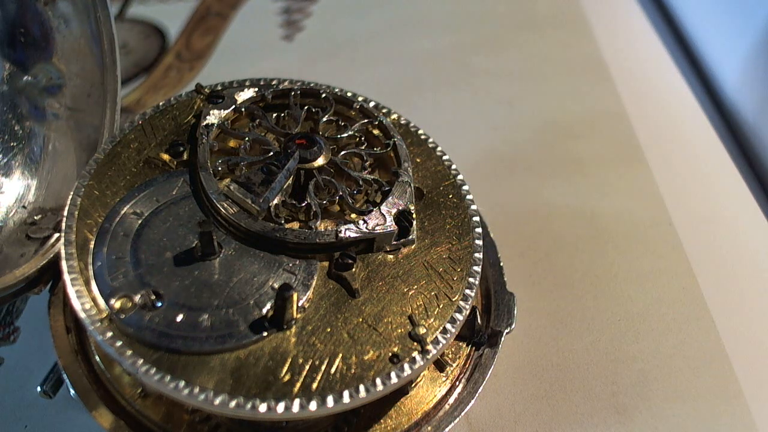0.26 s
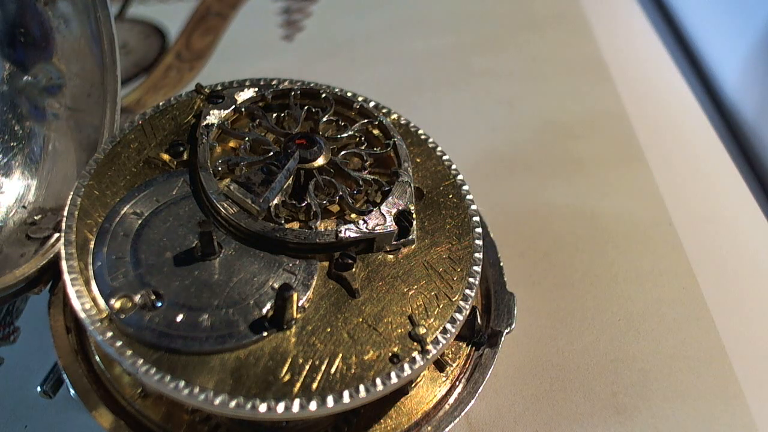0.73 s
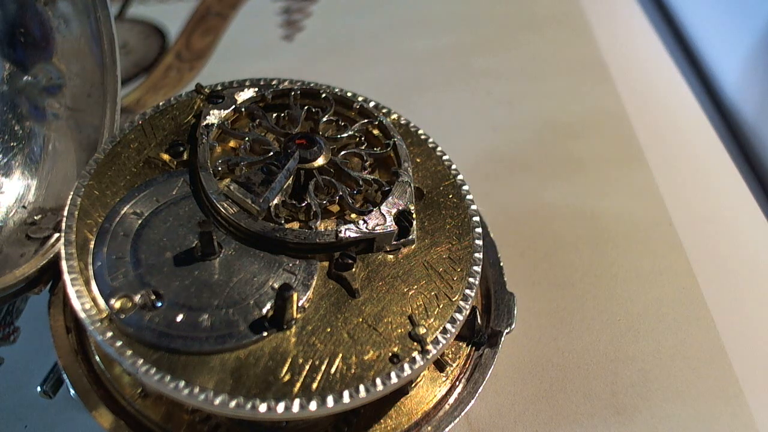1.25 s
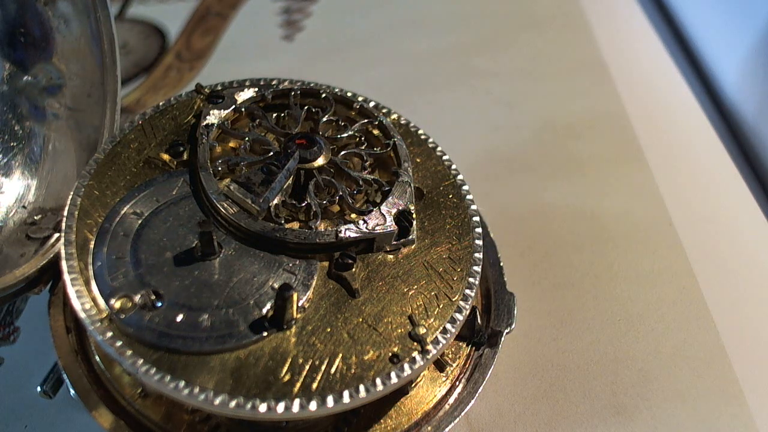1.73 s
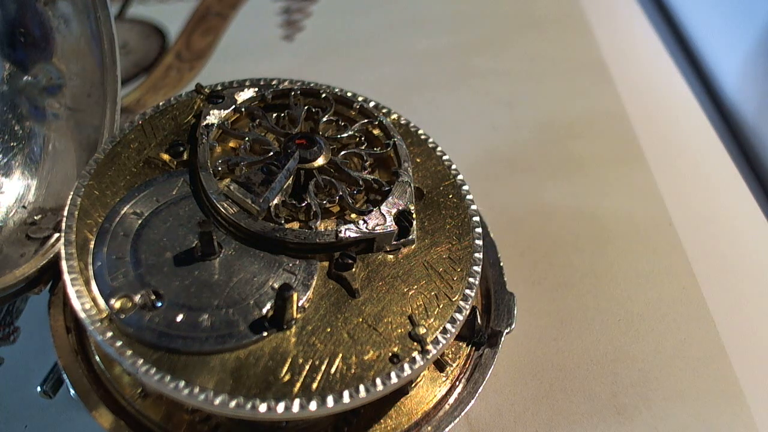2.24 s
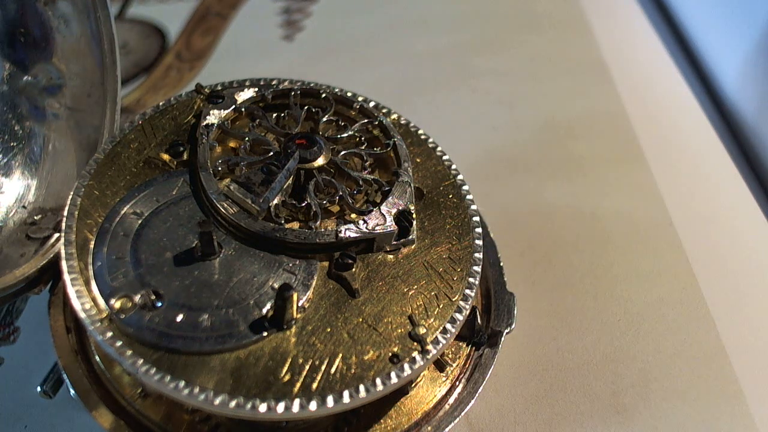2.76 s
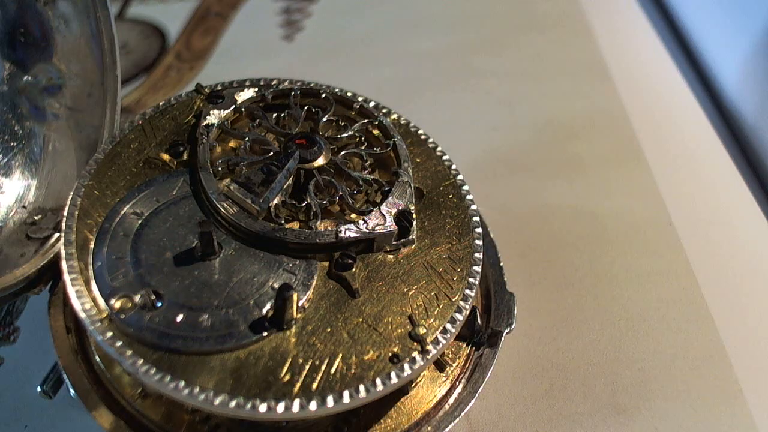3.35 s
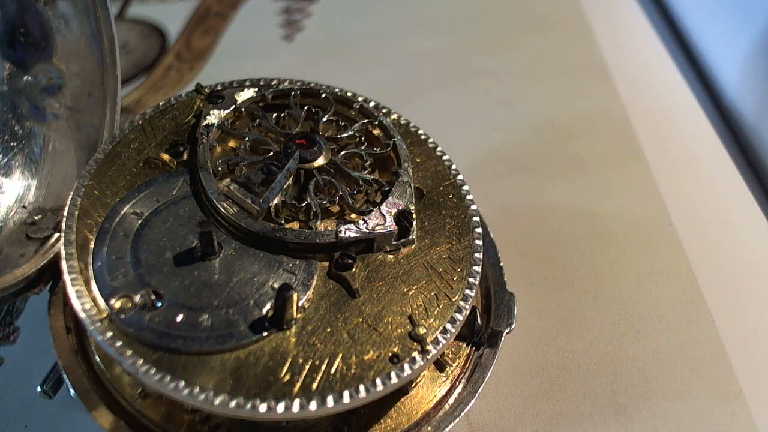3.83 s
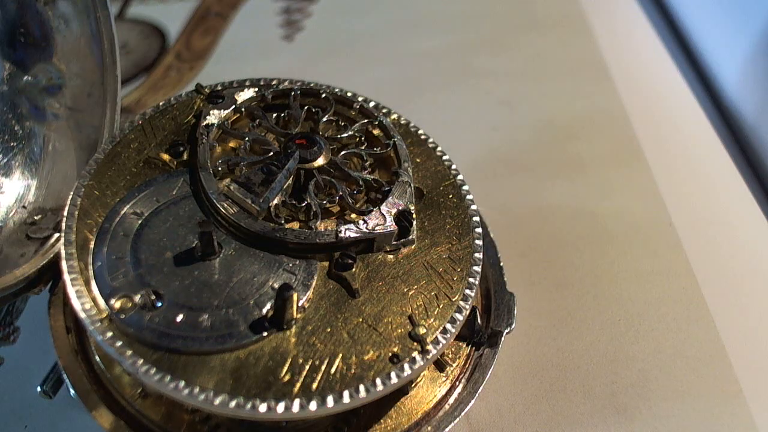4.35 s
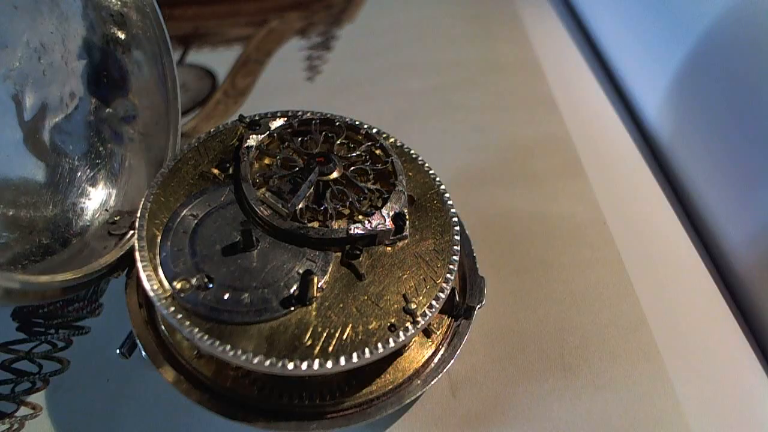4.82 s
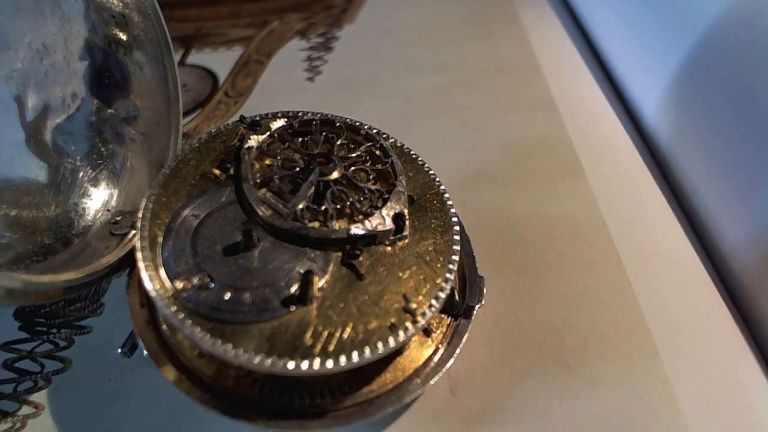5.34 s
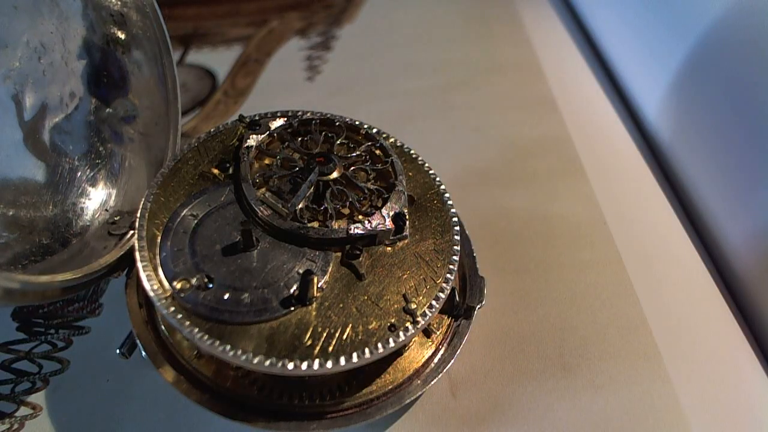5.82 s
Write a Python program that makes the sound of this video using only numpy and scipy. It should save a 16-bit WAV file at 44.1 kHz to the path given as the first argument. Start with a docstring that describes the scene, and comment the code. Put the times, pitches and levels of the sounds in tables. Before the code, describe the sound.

In a quiet room, a small microphone sits close to an open old pocket watch. At 0 seconds a low noise swell and light gritty scraping lead into a weak, rattling bump at about 0.07. A much stronger woody thump with scrape follows at 0.3, a cluster of knocks dying away by 0.5. The watch ticks throughout, from 0.14 to the end just after 6 seconds: thin, dry, bright metallic clicks about every 0.42 seconds, with much softer ticks between them, each a tiny double or triple click with a very short ring. The tick near 1.4 is duller. Faint brushing taps appear from 1.1, clearer at 2.4, 3.0, 3.5, 4.1, 4.5 and 4.9, soft and further away. Muffled low puffs come near 1.7, 3.4 to 3.6, 4.2, 4.7 and 5.0 to 5.4. Faint, mostly low, slightly wavering hiss lies underneath.

```python
"""A short swell of low noise and two scraping thumps on a bench come first, within half a second.
Close to a small camera microphone an old pocket watch lies open, beating loud and soft mostly by turns.
Soft brushing taps come from further off in the quiet room, short low swells rise over its hiss.
Watch and bench top are decaying sines; bench rattle, scrapes, brushes, swells and hiss are filtered noise."""
import sys
import numpy as np
from scipy import signal
from scipy.fft import rfft, irfft
from scipy.io import wavfile
from scipy.ndimage import uniform_filter1d

SR = 44100
rng = np.random.default_rng(int(sys.argv[2]) if len(sys.argv) > 2 else 0)


def master(y):
    """Save y as 16-bit WAV."""
    cut = np.clip(np.atleast_2d(y).T, -1, 1)
    pcm = np.round(cut * 32767)  # scale
    wavfile.write(sys.argv[1], SR, pcm.astype(np.int16))


N = 268128

# Escapement beats. Each row: blow in seconds, levels of upper ring, middle ring, lower ring and knock in dB,
# rebound against blow in dB, noise tail in dB, tilt of the tail in dB per octave.
BEATS = [(0.1404, -33.5, -54, -47.5, -58, -1.5, -58.5, 10), (0.5622, -31, -43, -45.5, -61, -6.5, -58.5, 3),
         (0.752, -62.5, -74, -52.5, -64, 0.5, -61.5, -14), (0.9838, -27, -39, -47.5, -59.5, -8, -57.5, 8),
         (1.174, -73, -72, -71, -78, -14, -66, -7), (1.3968, -70, -47, -49, -60.5, -8.5, -57, -9),
         (1.5915, -66, -67, -52.5, -61, -20, -62, -11.5), (1.8201, -25.5, -35.5, -33, -57, -21.5, -53, -2),
         (2.007, -60, -77, -55, -66, -26, -66, -3.7), (2.236, -28, -39, -34, -68, -20, -53.5, 0.1),
         (2.426, -49, -54, -44, -61, -8.5, -64, -4.1), (2.657, -28, -37, -34, -54, -4, -58.5, 9.5),
         (2.844, -59.5, -66, -56, -72, -10, -64.5, -2), (3.072, -27, -37.5, -31, -60.5, -17, -58, 3),
         (3.2617, -63, -62, -58.5, -70.5, -9, -63, -9),
         (3.4902, -25.5, -37.5, -34.5, -55.5, -20, -54.5, 5.5),
         (3.678, -61, -73.5, -66, -75.5, -21, -66.5, -4.2), (3.9063, -30, -44, -38, -67.5, -16, -62, 3),
         (4.1056, -64, -63, -47, -64.5, -8, -66, -5), (4.344, -30.5, -43.5, -45, -59.5, -19, -59, 2.5),
         (4.5407, -53.5, -80, -52.5, -69, -19, -65, 0.5), (4.7677, -58, -54, -46.5, -70.5, -32, -75, 1),
         (4.775, -30, -45, -45, -62, -24, -64.5, 3.5), (4.974, -61, -69, -54, -60, -10, -71, 0.1),
         (5.2074, -29, -42, -43, -60, -10, -57.5, 0.5), (5.4019, -45, -54.5, -47.5, -56.5, -6.5, -60, -7.5),
         (5.6359, -31, -45.5, -40.5, -60.5, 0, -58, 10), (5.831, -49, -63, -54.5, -66, -1.5, -68, -3.3),
         (6.069, -30, -47, -46, -61.5, -13.5, -61, 5.3)]
# Plates and case of the watch, in four groups. Each row: pitch in Hz, strength within the group in dB,
# 60 dB decay time in seconds.
UPPER_RING = [(6254, -8.5, 0.0077), (6413, -2, 0.015), (6638, 13, 0.005), (6723, 0, 0.0071),
              (7950, -25, 0.014), (8860, -17.5, 0.018)]
MIDDLE_RING = [(4336, 0.5, .013), (4603, -1, 0.022), (4810, -1.5, 0.0097), (5320, -5, 0.026),
               (5758, -1, 0.024), (5995, -4.5, .015)]
LOWER_RING = [(3560, -16.5, 0.01), (3783, 7, 0.014), (3897, -1, 0.019), (4150, 4, 0.01)]
KNOCK = [(1160, -2.5, 0.16), (1568, -2.5, 0.045), (1805, 2, 0.035), (2263, -5.5, 0.048),
         (2640, -2.5, 0.048), (2775, -0.5, 0.025)]
FIRM_BEAT_DB = -30  # upper ring of a firm beat
RECOIL_DB, RECOIL_SLOPE = -23.5, -0.21  # recoil against blow at a firm beat; dB per dB of upper ring
REBOUND_S, RECOIL_S = 0.0024, 0.0098  # after the blow
UPPER_PAN_DB, MIDDLE_PAN_DB, LOWER_PAN_DB = 2, 1, -5  # left minus right
TAIL_S, TAIL_S_PER_DB, TAIL_FALL_DB_S = 0.032, 0.0004, 700  # length, its growth as beats soften, extra fall
TAIL_WIDTH_HZ, TAIL_SCATTER_DB, TAIL_T60_S = 220, 4, 0.12
# rise time of the leading noise, even part, part following the rebound
LEADING_S, LEADING_DB, LEADING_UNDER_REBOUND_DB = 0.025, -69.5, -24

# Thumps on the bench. Each row: start in seconds, length of the rattle in seconds, low level in dB,
# middle level in dB.
THUMPS = [(0.066, 0.11, -43, -48), (0.317, 0.13, -33.5, -37)]
# Broad colour of the rattle. Each row: centre in Hz, width in Hz, strength in dB.
RATTLE_COLOUR = [(347, 67, -17), (616, 63, 20), (1043, 200, -27), (1560, 220, 4), (2120, 240, -24.5),
                 (2180, 270, -14)]
RATTLE_RISE_S, SAG_DB_S, FADE_DB_S = 0.0063, 58.5, 401.5
BRIGHT_S, MIDDLE_FALL_DB_S = 0.042, 269  # the middle holds, then drops away
# Single jolts within the thumps. Each row: start in seconds, level of the middle modes in dB, pitch in Hz,
# upper modes against middle in dB, low modes against middle in dB.
JOLTS = [(0.0646, -36.5, 560, -7.5, -6), (0.075, -35, 720, -8, 4), (0.0772, -30.5, 740, -16, -6),
         (0.084, -33.5, 760, -5, -2), (0.091, -35, 760, 0.5, -14), (0.105, -37, 720, 1.5, -6.5),
         (0.124, -41, 620, 0, -12), (0.162, -39, 610, -20, -17), (0.174, -43, 630, -23, -20),
         (0.188, -47, 720, -30, -14), (0.311, -27.5, 590, -5, -10), (0.319, -32, 600, 8.5, -3.5),
         (0.322, -25.5, 750, 8, -5), (0.3294, -13.5, 720, -13, -13.5), (0.337, -23.5, 770, -5, -7.5),
         (0.35, -24, 780, -2.5, -9), (0.368, -27.5, 680, 0.1, -4.5), (0.383, -25.5, 690, -7, -12.5),
         (0.395, -33, 680, -3, -14), (0.411, -32, 620, -5, -16), (0.426, -39, 620, -5.5, -15),
         (0.436, -39, 690, -6, -15), (0.447, -34.5, 690, -15, -22), (0.462, -45, 700, -12, -16)]
# Modes of the bench top, in three groups. Each row: pitch in Hz, strength within the group in dB
# (for the middle group, before the pull toward a jolt's pitch), 60 dB decay time in seconds.
BENCH_LOW = [(307, -1, 0.058), (392, -5, 0.062), (471, -2.5, 0.067)]
BENCH_MIDDLE = [(532, -2, 0.045), (596, -1, 0.047), (685, 2, 0.036), (765, 0.5, 0.051), (808, -8.5, 0.034)]
BENCH_UPPER = [(970, 0, 0.042), (1100, 7, 0.037), (1402, 7.5, 0.021), (1586, -10.5, 0.039),
               (2000, -13.5, 0.026), (2214, -6, 0.043), (2350, -4, 0.039), (2591, -1.5, 0.037),
               (2857, -13.5, .04)]
FOCUS_DB = 61  # loss of a middle mode one octave from the pitch of the jolt

# Gritty scrapes along the bench. Each row: start in seconds, length in seconds, level in dB,
# tilt in dB per octave.
SCRAPES = [(0.0, .025, -67, -2.5), (0.027, 0.03, -56, 5), (0.06, 0.047, -69.5, 7), (0.288, 0.023, -65, -2),
           (0.303, 0.051, -44, -2.5), (0.349, 0.024, -47, 3.5), (0.381, 0.016, -52.5, -8),
           (0.391, 0.039, -59.5, -13.5)]
# Resonances of the scrape. Each row: centre in Hz, half the width of its filter in Hz, strength in dB.
SCRAPE_MODES = [(2087, 400, -1.5), (2900, 100, -1.5), (3616, 55, 1), (3820, 40, -1), (4130, 110, -2),
                (4520, 93, -0.5), (4830, 47, -0.5), (5200, 28, -1.5), (5350, 32, -7), (5520, 50, -6.5),
                (5940, 44, -11), (6450, 140, -10.5), (6930, 50, -11.5), (7900, 210, -11)]
SCRAPE_RISE_S, SCRAPE_FALL_DB_S = 0.0042, 699.5  # the fall is that at 4000 Hz

# Soft brushing taps. Each row: start in seconds, level in dB, centre in Hz, 60 dB decay time in seconds,
# level of the upper band in dB.
BRUSH = [(1.13, -62.5, 3220, 0.55, -75.5), (1.199, -72, 2980, 0.87, -86), (1.49, -69, 2420, 0.63, -81),
         (2.09, -60.5, 3080, 0.24, -74.5), (2.415, -43.5, 2630, 0.071, -66), (2.969, -49, 3220, 0.19, -70),
         (3.547, -45.5, 3010, 0.17, -67), (4.119, -48.5, 3200, 0.13, -70), (4.52, -53.5, 2730, 0.13, -69),
         (4.941, -49, 3200, 0.18, -68)]
BRUSH_RISE_S, BRUSH_TOP_HZ = 0.033, 6700  # the upper band sounds with every brush
# Short swells of low noise; those near 130-165 Hz are the room's own rumble rising. Each row: start in seconds
# (one begins before the opening), level in dB, centre in Hz, 60 dB decay time in seconds.
LOW_SWELLS = [(-0.006, -37.5, 268, 0.15), (.028, -43.5, 291, 0.29), (1.71, -58.5, 417, 0.24),
              (3.38, -52, 150, 0.097), (3.573, -47, 398, 0.19), (4.16, -50.5, 163, 0.11),
              (4.7, -54, 151.8, 0.13), (5.035, -48.5, 153, 0.11), (5.195, -48, 520, 0.093),
              (5.25, -56, 132.6, 0.22), (5.33, -50.5, 376, 0.25), (5.375, -47, 243, 0.091)]
LOW_SWELL_RISE_S = 0.013

# Room hiss below and above its edge. Each row: frequency in Hz, relative density in dB per Hz.
ROOM = [(30, -33.5), (60, -24.5), (90, -17.5), (118, 0), (150, -0.5), (260, -3), (385, -1.5), (450, -4),
        (680, -8), (820, -3.5), (950, -8.5), (1250, -11)]
AIR = [(1400, -35), (2500, -34), (3300, -41.5), (4200, -34), (5500, -33.5), (7200, -45.5), (7500, -34),
       (8600, -39.5)]
# Stereo width of the hiss. Each row: frequency in Hz, shaping of side against mid in dB.
WIDTH = [(40, -5), (70, -7), (130, -14.5), (300, -7.5), (1000, -20), (1400, -11), (4000, 2.5), (4300, -17),
         (7000, -11), (7600, 0.5)]
# Narrow bands of noise in the upper hiss. Each row: frequency in Hz, relative strength while on in dB.
NARROW_BANDS = [(1350, -11), (2000, -9), (2700, -14), (3200, -30), (7000, -32.5)]
ROOM_DB = -64.5  # hiss and narrow bands together
SHELF_HZ, TOP_HZ = 7300, 9200


def undb(db):
    """Amplitude factor for a level in dB."""
    return 10 ** (np.asarray(db) / 20)


def unit(x):
    """Scale to an RMS of 1."""
    return x / np.sqrt(np.mean(x ** 2))


def band(x, hz, width):
    """Two-pole resonance, gain 1 at the centre."""
    return signal.lfilter(*signal.iirpeak(hz, hz / width, fs=SR), x)


def between(x, lo_hz, hi_hz):
    """Band-pass from lo_hz to hi_hz."""
    return signal.sosfilt(signal.butter(3, [lo_hz, hi_hz], "band", fs=SR, output="sos"), x)


def on_log(table, hz):
    """Read a table of (Hz, dB) along a logarithmic frequency axis."""
    f, db = np.transpose(table)
    return np.interp(np.log(hz), np.log(f), db)


def walk(rate):
    """Random levels held 1 / rate s and slewed twice; spread near 1."""
    k = int(SR / rate)
    steps = np.repeat(rng.standard_normal(N // k + 1), k)
    return 1.42 * uniform_filter1d(uniform_filter1d(steps, k), k)[:N]


def add(out, s, x):
    """Mix x into out from s seconds, trimmed at both ends of the scene."""
    i = int(s * SR)
    x = x[..., max(-i, 0):N - i]
    out[:, max(i, 0):max(i, 0) + x.shape[-1]] += x


def spread(x, other, pan_db, side_db):
    """Left and right from a middle sound and an unrelated side sound."""
    sign = np.array([[1], [-1]])
    return (x + undb(side_db) * sign * other) * undb(sign * pan_db / 2)


def ring(modes, t, rise, scatter_db=3.5, detune=0.0057, slip=1.99):
    """One blow of peak 1: decaying sines, each a little different in strength, pitch and phase."""
    hz, db, t60 = np.transpose(modes)[:, :, None]
    a, b, c = rng.standard_normal((len(modes), 3)).T[:, :, None]
    t = np.maximum(t, 0)
    decay = undb(db + scatter_db * b - 60 * t / t60)
    tones = np.sin(2 * np.pi * hz * (1 + detune * a) * t + slip * c) * decay
    blow = tones.sum(axis=0) * (1 - np.exp(-(t / rise) ** 2))
    return blow / np.abs(blow).max()


def taps(modes, t, rise, rebound_db, recoil_db):
    """The blow of a tooth on the pallet, its rebound and the recoil of the wheel ring the same modes."""
    blow = ring(modes, t, rise)
    rebound = undb(rebound_db) * ring(modes, t - REBOUND_S, rise)
    recoil = undb(recoil_db) * ring(modes, t - RECOIL_S, rise)
    return blow + rebound + recoil


def unsteady_noise(length, tilt_db):
    """Unsteady noise in bands at the ring pitches of the watch, RMS 1, as mid and side."""
    noise = rng.standard_normal((2, length)) * undb(2.2 * walk(200)[:length])
    total = np.zeros((2, length))
    for hz, _, _ in LOWER_RING + MIDDLE_RING + UPPER_RING[:-1]:
        gain = undb(TAIL_SCATTER_DB * rng.standard_normal() + tilt_db * np.log2(hz / 5000))
        total += gain * band(band(noise, hz, TAIL_WIDTH_HZ), hz, TAIL_WIDTH_HZ)
    return unit(total)


def watch():
    """A tooth lands, rebounds, and the wheel recoils; the plates ring, then a faint noise tail holds and drops."""
    out, lead = np.zeros((2, N)), 0.04  # seconds kept ahead of the blow
    t = np.arange(SR // 5) / SR - lead
    after = np.maximum(t, 0)
    # faint noise rises briefly ahead of the blow
    leading_shape = np.clip(1 + t / LEADING_S, 0, 1) * np.exp(-after / 0.0012)
    for s, upper_db, middle_db, lower_db, knock_db, rebound_db, tail_db, tilt_db in BEATS:
        softer_db = FIRM_BEAT_DB - upper_db
        recoil_db = RECOIL_DB - RECOIL_SLOPE * softer_db
        groups = (  # modes, level dB, rise s, pan dB, side dB
            (UPPER_RING, upper_db, 0.0008, UPPER_PAN_DB, -12.0),
            (MIDDLE_RING, middle_db, 0.0011, MIDDLE_PAN_DB, -22.0),
            (LOWER_RING, lower_db, 0.0012, LOWER_PAN_DB, -19.0),
            (KNOCK, knock_db, 0.003, 0.6, -19.0))
        beat = np.zeros((2, len(t)))
        for modes, db, rise, pan_db, side_db in groups:
            mid, side = [taps(modes, t, rise, rebound_db, recoil_db) for _ in range(2)]
            beat += undb(db) * spread(mid, side, pan_db, side_db)
        noise = unsteady_noise(len(t), tilt_db)
        lasts = TAIL_S + TAIL_S_PER_DB * softer_db  # softer beats have a longer tail of noise
        tail_shape = undb(-60 * after / TAIL_T60_S - TAIL_FALL_DB_S * np.maximum(after - lasts, 0))
        tail_shape = tail_shape * (1 - np.exp(-after / 0.0046))
        leading = undb(LEADING_DB) + undb(upper_db + rebound_db + LEADING_UNDER_REBOUND_DB)
        faint = noise * (leading * leading_shape + undb(tail_db) * tail_shape)
        add(out, s - lead, beat + spread(*faint, 1.4, -14.5))
    return out


def rattle():
    """Dense noise coloured by broad resonances of the bench, its middle band flickering, during each thump."""
    out, t = np.zeros((2, N)), np.arange(N) / SR
    grit = rng.standard_normal((2, N))
    body = np.zeros((2, N))
    for k, (hz, width, db) in enumerate(RATTLE_COLOUR):
        body += (-1) ** k * undb(db) * band(grit, hz, width)
    low = unit(between(body, 280, 1200))
    flicker = body * undb(3.5 * walk(150))
    middle = unit(between(between(flicker, 820, 2750), 700, 2850))
    for s, lasts, low_db, middle_db in THUMPS:
        since = np.maximum(t - s, 0)
        past = np.maximum(since - BRIGHT_S, 0)
        gate = np.exp(np.minimum(t - s, 0) / RATTLE_RISE_S) * undb(-FADE_DB_S * np.maximum(since - lasts, 0))
        low_part = undb(low_db - SAG_DB_S * since) * low
        middle_part = undb(middle_db - MIDDLE_FALL_DB_S * past) * middle
        out += gate * (low_part + middle_part)
    return out


def jolt(pitch_hz, upper_db, deep_db):
    """One knock on the bench top; the middle modes near its pitch ring most."""
    t = np.arange(SR // 8) / SR
    near = [(hz, db - FOCUS_DB * abs(np.log2(hz / pitch_hz)), t60) for hz, db, t60 in BENCH_MIDDLE]
    middle = ring(near, t, 0.00084, scatter_db=2.5, slip=0.29)
    upper = undb(upper_db) * ring(BENCH_UPPER, t, 0.0017)
    deep = undb(deep_db) * ring(BENCH_LOW, t, 0.003)
    return middle + upper + deep


def thumps():
    """Single jolts ring the bench top and a dense rattle fills in between."""
    out = rattle()
    for s, db, pitch_hz, upper_db, deep_db in JOLTS:
        pair = np.array([jolt(pitch_hz, upper_db, deep_db) for _ in range(2)])
        add(out, s, undb(db) * pair)
    mid, side = between(out, 150, 7200)
    return spread(mid, side + undb(-1.5) * band(side, 300, 250), 0.78, -21.0)  # wider near 300 Hz


def scrapes():
    """Dense uneven grit excites narrow resonances while each scrape lasts."""
    out, t = np.zeros((2, N)), np.arange(SR // 4) / SR
    for s, lasts, level_db, tilt_db in SCRAPES:
        uneven = rng.standard_normal((2, len(t))) * undb(2.9 * walk(300)[:len(t)])
        grit = between(uneven, 1400, 8300) * (1 - np.exp(-t / SCRAPE_RISE_S))
        fall_db = SCRAPE_FALL_DB_S * np.maximum(t - lasts, 0)
        sound = undb(-25.5 - 2.0 * fall_db) * grit
        for hz, half_width, db in SCRAPE_MODES:
            width = 2.0 * half_width
            gain = undb(db + tilt_db * np.log2(hz / 4000) - fall_db * hz / 4000)  # the highest die first
            sound += gain * band(band(grit, hz, width), hz, width)
        steady = sound / np.std(sound[:, t < lasts])
        add(out, s, undb(level_db) * spread(*steady, 1.1, -22))
    return out


def puffs(table, rise, relative_width, side_db, grain_db, streak=0):
    """Short swells of noise in one resonance passed three times, with optional narrow streaks."""
    out, t = np.zeros((2, N)), np.arange(SR // 2) / SR
    for s, db, hz, t60 in table:
        noise = rng.standard_normal((2, SR)) * undb(grain_db * walk(140)[:SR])
        for _ in range(3):
            noise = band(noise, hz, relative_width * hz)
        octaves = rng.uniform(-0.35, 0.6, size=8)
        noise = noise + sum(streak * band(noise, hz * 2 ** u, 0.026 * hz) for u in octaves)
        shape = undb(db - 60 * t / t60) * (1 - np.exp(-(t / rise) ** 2))
        settled = unit(noise[:, -len(t):])
        add(out, s, spread(*(settled * shape), 0, side_db))
    return out


def brushes():
    """Further off, each soft tap is a broad grainy puff with streaks, and a narrower band above it."""
    lower = [row[:4] for row in BRUSH]
    upper = [(s, db, BRUSH_TOP_HZ, t60) for s, _, _, t60, db in BRUSH]
    return (puffs(lower, BRUSH_RISE_S, 0.82, -22.5, 2.2, streak=1.1)
            + puffs(upper, BRUSH_RISE_S, 0.17, -17.5, 2.8))


def low_swells():
    """Short narrow swells of low noise; those near 130-165 Hz are the room's own rumble rising."""
    return puffs(LOW_SWELLS, LOW_SWELL_RISE_S, 0.3, -12.5, 0)


def room():
    """A low hiss that ends abruptly, a much fainter one above, and narrow noise bands switching on and off."""
    hz = np.maximum(np.arange(N // 2 + 1) * SR / N, 1)
    edge = 1 / (1 + (hz / 1300) ** 40)
    colour = undb(on_log(ROOM, hz)) * edge + undb(on_log(AIR, hz)) * (1 - edge)
    mid, side = rfft(rng.standard_normal((2, N))) * colour
    side = side * undb(on_log(WIDTH, hz))
    out = spread(irfft(mid, N), irfft(side, N), 0, 0) * undb(1.6 * walk(15))
    for centre in 3000 * 2 ** np.arange(0, 1.3, 1 / 4):  # the level of the upper hiss wavers band by band
        out += (undb(1.5 * walk(12)) - 1) * band(out, centre, centre / 8)
    for centre in 1350 * 2 ** np.arange(0, 2.4, 1 / 14):
        width = centre / 50
        pair = band(band(rng.standard_normal((2, N)), centre, width), centre, width)
        switch = 0.5 + 0.5 * np.tanh(10.0 * (walk(14) - 0.7))
        out += undb(on_log(NARROW_BANDS, centre)) * switch * spread(*pair, 0, -16.0)
    return unit(out) * undb(ROOM_DB)


def scene():
    """The watch close by, the bench under it, the brushes further off, the low swells and the room."""
    return watch() + thumps() + scrapes() + brushes() + low_swells() + room()


def record(dry):
    """The recorder drops steeply above the shelf, keeps a trace beyond it, and cuts the top."""
    shelf = signal.ellip(8, 0.1, 35, SHELF_HZ, fs=SR, output="sos")
    top = signal.ellip(8, 0.2, 60, TOP_HZ, fs=SR, output="sos")
    body = signal.sosfiltfilt(shelf, dry)
    return signal.sosfilt(top, body + undb(-22.5) * dry)


dry = scene()
out = record(dry)
master(out)
```